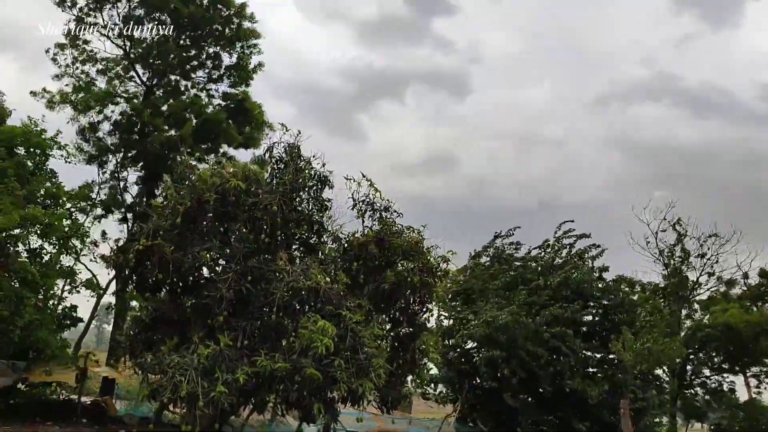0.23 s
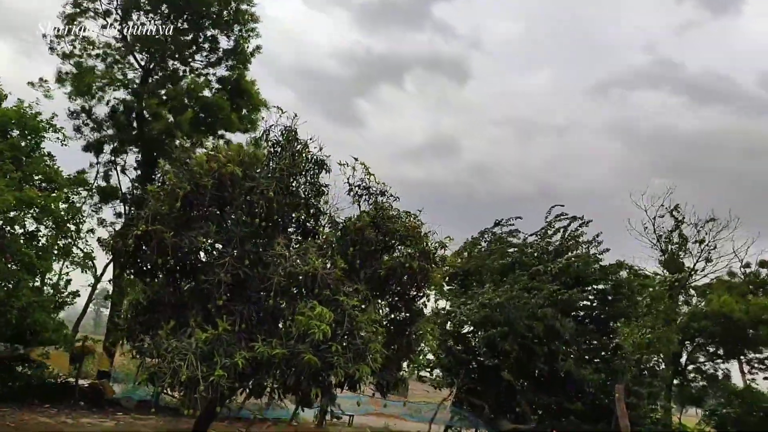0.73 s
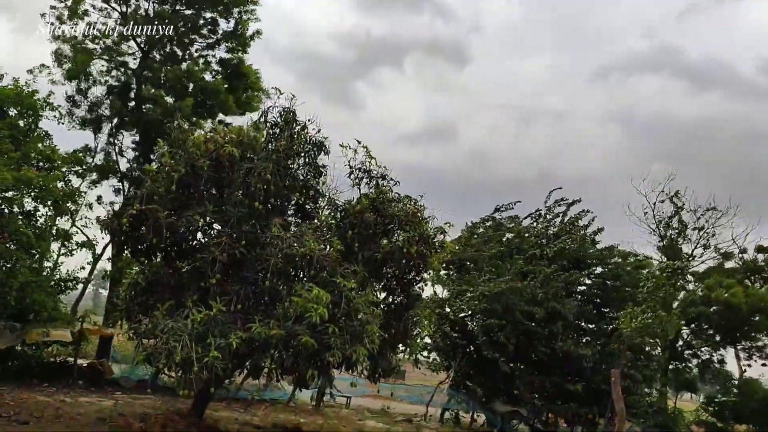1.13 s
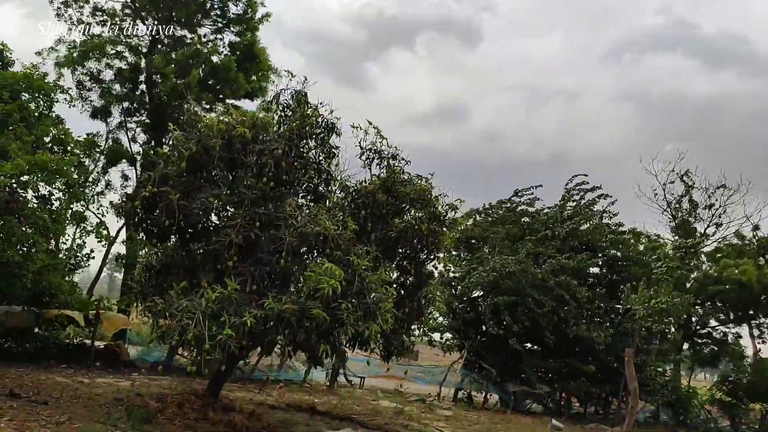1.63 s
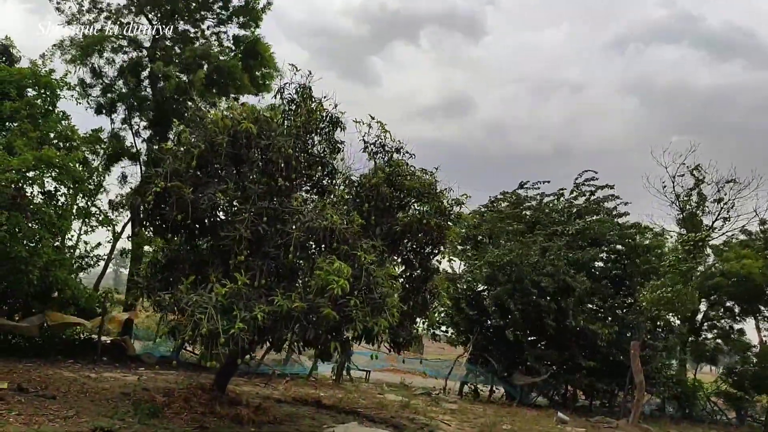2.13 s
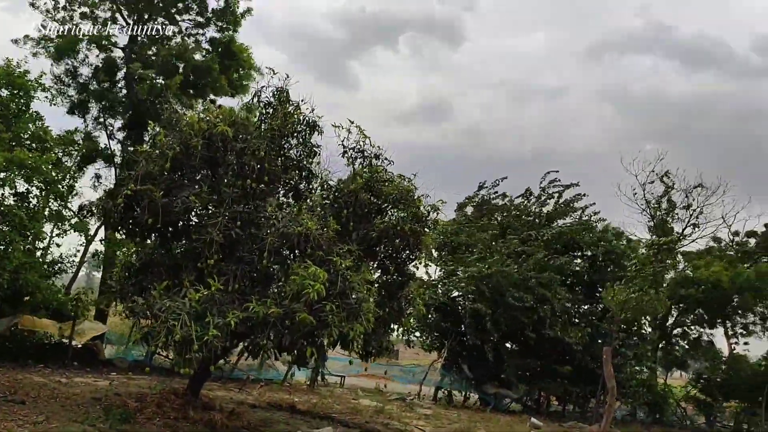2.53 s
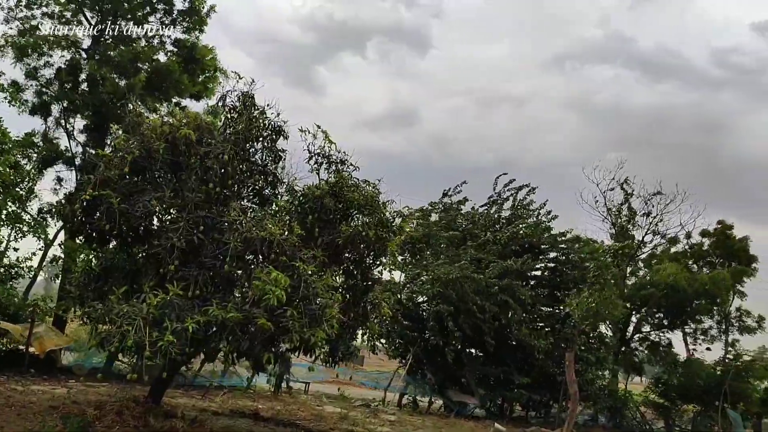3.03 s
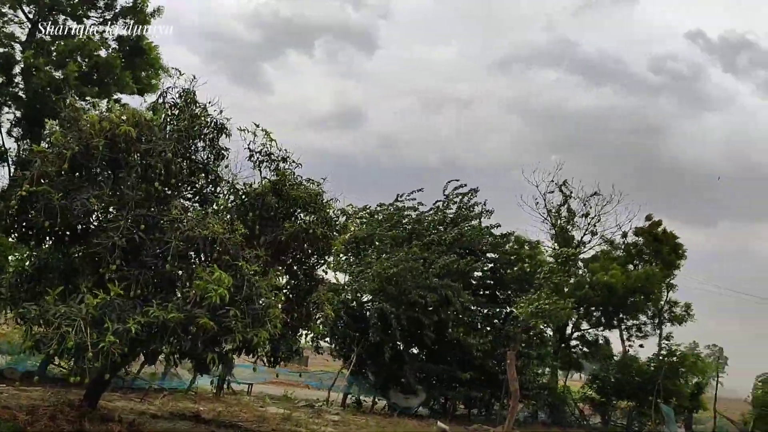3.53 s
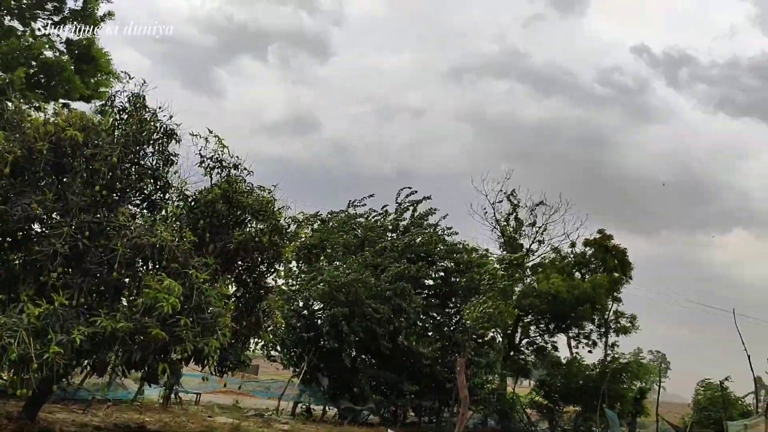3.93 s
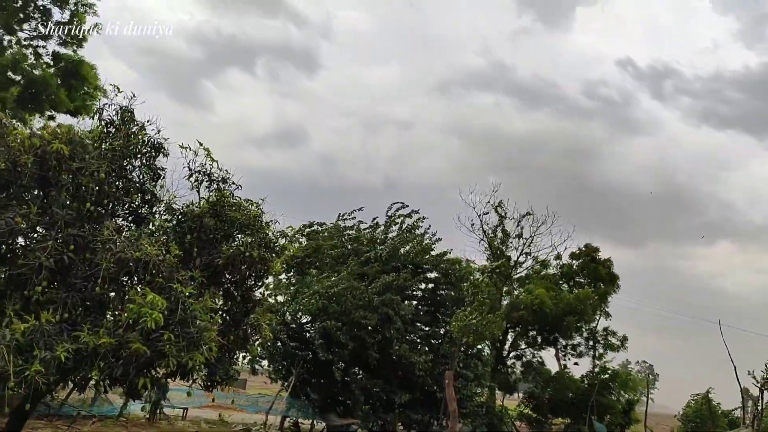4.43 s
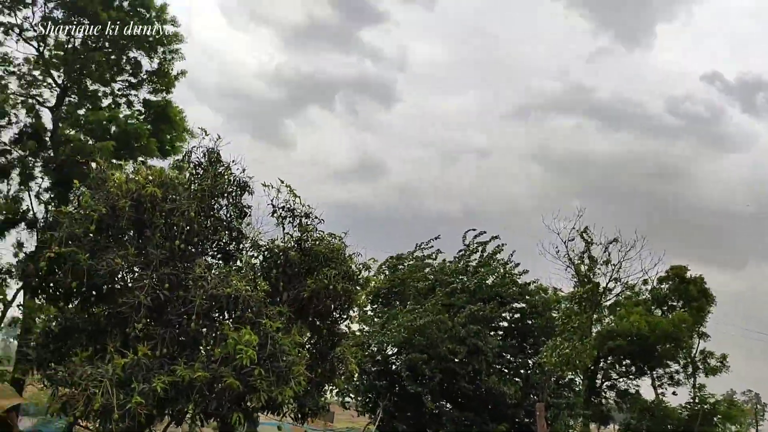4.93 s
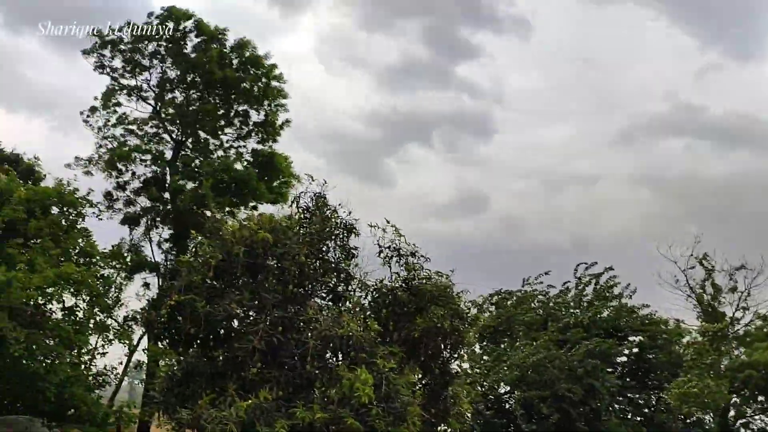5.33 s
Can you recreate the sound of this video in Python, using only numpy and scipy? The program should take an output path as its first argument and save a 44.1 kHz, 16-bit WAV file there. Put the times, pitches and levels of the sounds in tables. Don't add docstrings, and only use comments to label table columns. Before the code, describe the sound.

Strong wind buffets and pops against a microphone, eases to leafy hiss in the middle, then gusts back harder at the end.

```python
import sys
import numpy as np
from scipy import signal
from scipy.fft import rfft, irfft
from scipy.io import wavfile
from scipy.ndimage import uniform_filter1d, map_coordinates

SR = 44100
rng = np.random.default_rng(int(sys.argv[2]) if len(sys.argv) > 2 else 0)


def gain_from_db(level_db):
    decades = np.asarray(level_db, float) / 20
    return 10 ** decades


def store_wav(level_fs):
    pcm = np.round(np.clip(np.atleast_2d(level_fs), -1, 1) * 32767)
    wavfile.write(sys.argv[1], SR, pcm.T.astype(np.int16))


N = 246078

# (time [s], peak level [dB], speed jump [log ratio], fade [s])
SLAPS = [(0.029, -24, 0.18, 0.017), (0.099, -30, 0.16, 0.018), (0.145, -17, 0.25, 0.014),
         (0.185, 2, 0.16, 0.018), (0.227, -2, 0.3, 0.013), (0.251, -30, 0.18, 0.013),
         (0.308, -5, 0.21, 0.015), (0.385, -24.5, 0.21, 0.014), (0.485, -27.5, 0.19, 0.021),
         (0.498, -21, 0.18, 0.018), (0.529, -41, 0.18, 0.015), (0.562, -7.5, 0.2, 0.014),
         (0.638, -33.5, 0.24, 0.013), (1.112, -30.5, 0.15, 0.013), (3.847, -24, 0.13, 0.026),
         (3.892, -31, 0.17, 0.016), (3.983, -19, 0.21, 0.021), (4.017, -28, 0.22, 0.015),
         (4.035, -34, 0.21, 0.013), (4.076, -27, 0.17, 0.014), (4.129, -35.5, 0.24, 0.014),
         (4.153, -30.5, 0.16, 0.017), (4.181, -26, 0.2, 0.015), (4.222, -24.5, 0.22, 0.014),
         (4.289, -24, 0.18, 0.019), (4.355, -19.5, 0.17, 0.018), (4.404, -16, 0.24, 0.019),
         (4.444, -17.5, 0.19, 0.015), (4.507, -10.5, 0.2, 0.016), (4.535, -17.5, 0.19, 0.016),
         (4.624, -12.5, 0.2, 0.012), (4.742, -38, 0.21, 0.017), (4.768, -26.5, 0.2, 0.017),
         (4.822, -38, 0.17, 0.018), (4.859, -30, 0.19, 0.017), (4.94, -15, 0.22, 0.016),
         (4.968, -20, 0.2, 0.0097), (5.017, -32, 0.23, 0.014), (5.063, -18.5, 0.2, 0.013),
         (5.11, -11, 0.21, 0.016), (5.151, -14.5, 0.22, 0.016), (5.21, -24.5, 0.18, 0.019),
         (5.281, 0.5, 0.2, 0.016), (5.334, -28, 0.19, 0.015), (5.357, -28.5, 0.23, 0.01),
         (5.399, -3.5, 0.22, 0.015), (5.449, -6, 0.25, 0.018), (5.478, -17, 0.16, 0.021),
         (5.502, 4.5, 0.19, 0.016), (5.538, -11.5, 0.19, 0.013)]


def rms_one(x):
    return x / np.sqrt(np.mean(x ** 2) + 1e-20)


def smooth_twice(x, size):
    return uniform_filter1d(uniform_filter1d(x, size=size), size=size)


def in_time(rows):
    s, *columns = np.transpose(rows)
    return [np.interp(np.arange(N) / SR, s, c) for c in columns]


def at_hz(points, hz):
    point_hz, value = np.transpose(points)
    return np.interp(np.log(hz), np.log(point_hz), value)


def swells(rows):
    t = np.arange(0, N + 64, 64) / SR
    total = sum(height * np.clip(1 - abs(t - s) / swell, 0, 1) for s, height, swell in rows)
    return np.interp(np.arange(N) / SR, t, total)


def drift(rate):
    r = np.exp(-80 * np.pi * rate / SR)
    noise = rng.standard_normal(N // 40 + 2002)
    slow = signal.lfilter([1], [1, -2 * r, r * r], noise)[2000:]
    return np.interp(np.arange(N) / 40, np.arange(len(slow)), rms_one(slow))


def poles(hz, r):
    return [1, -2 * r * np.cos(2 * np.pi * hz / SR), r * r]


def filtered(x, hz, kind):
    return signal.sosfilt(signal.butter(2, hz, kind, fs=SR, output="sos"), x)


def coloured(white, spectrum, spacing):
    hz = np.fft.rfftfreq(white.shape[-1], spacing) + 1e-6
    return irfft(rfft(white) * gain_from_db(at_hz(spectrum, hz)), white.shape[-1])


def stereo_bands(source, patchy_db):
    # (frequency [Hz], correlation [-1..1])
    likeness = [(130, 1), (290, 1), (640, 0.42), (1400, -0.17), (6800, 0.071), (9500, 0.98), (15000, 0.52)]
    hz = np.fft.rfftfreq(N, 1 / SR) + 1e-6
    alike = np.clip(at_hz(likeness, hz), -1, 1)
    mid, side = rfft(source)
    pair = np.sqrt(1 + alike) * mid + np.sqrt(1 - alike) * side * [[1], [-1]]
    out, together = 0, drift(12.0)
    for octave in np.arange(4, 15):
        share = np.clip(1 - abs(np.log2(hz) - octave), 0, 1)
        flicker_db = patchy_db * (0.3 * together + drift(13.0))
        out = out + gain_from_db(flicker_db) * irfft(pair * share, N)
    return rms_one(out)


def leaves():
    # (time [s], level [dB])
    crowns = [
        (0, -34.5),
        (.34, -35),
        (1.09, -35),
        (1.41, -37),
        (2.72, -39),
        (3.29, -40.5),
        (4.56, -40.5),
        (5.13, -41),
        (5.26, -38.5),
        (5.58, -38.5),
    ]
    # (frequency [Hz], level [dB per Hz])
    leaf = [(350, -24.5), (700, 2), (1300, 0), (2300, -1), (5000, 3.5), (7600, 1), (8400, -3.5),
            (9200, -7.5), (12000, -7.5), (15500, -23.5)]
    t = np.arange(N) / SR
    clicks = gain_from_db(0.76 * rng.exponential(1, (2, N))) * rng.standard_normal((2, N))
    hiss = stereo_bands(coloured(clicks, leaf, 1 / SR), patchy_db=0.5)
    sheen_db = 3 - 1.58 * t
    top = signal.sosfiltfilt(signal.butter(2, 8800, "high", fs=SR, output="sos"), hiss)
    hiss = hiss + top * (gain_from_db(sheen_db) - 1)
    left_lead_db = -0.6 + 0.4847 * t
    return gain_from_db(in_time(crowns) + left_lead_db * [[1], [0]]) * hiss


def roar():
    # (frequency [Hz], level [dB per Hz])
    far_wind = [(20, 1.5), (60, 2), (120, 1), (300, -4.5), (600, -9), (1200, -22.5)]
    noise = coloured(rng.standard_normal((2, N)), far_wind, 1 / SR)
    return gain_from_db(-41.5) * stereo_bands(noise, patchy_db=1.5)


def left_cavity(x):
    # (frequency [Hz], width [Hz], level [dB])
    cavity = [
        (2280, 950, 1.5),
        (7520, 900, 5.5),
    ]
    out = x.copy()
    for hz, width_hz, db in cavity:
        r = np.exp(-np.pi * width_hz / SR)
        out += gain_from_db(db) * signal.lfilter([(1 - r * r) / 2, 0, (r * r - 1) / 2], poles(hz, r), x)
    return out


def air(stream, puffs):
    level_db, eddy_hz = in_time(stream)
    extra_db = swells(puffs)
    quicker_per_db = 0.0085
    return level_db + extra_db, eddy_hz * np.exp(quicker_per_db * extra_db)


def windward_air():
    # (time [s], pressure [dB], eddy rate [Hz])
    stream = [(0, -5.5, 470), (.26, -14, 380.2), (.44, -22, 130.9), (.72, -25.5, 99.74), (.82, -41, 98.9),
              (1.3, -35, 94.67), (1.68, -45, 59.73), (3.44, -89.5, 55.76), (3.5, -33, 49.55),
              (3.79, -35, 69.07), (4.07, -23.5, 140.3), (4.33, -24, 178.4), (4.56, -15, 250.4),
              (4.6, -25.5, 140.5), (5.0, -17.5, 200.5), (5.07, -13.5, 327.8), (5.29, -11, 438.3),
              (5.58, -7.5, 580.3)]
    # (time of the crest [s], extra level [dB], time to swell and to fade [s])
    puffs = [(0.16, 4, 0.073), (.295, -5, 0.029), (0.368, 3.5, 0.031), (0.511, 9, 0.035), (0.551, 7, 0.036),
             (0.65, 8, 0.092), (0.782, 9, 0.051), (0.881, 14, 0.054), (.95, 19, 0.037), (1.109, 22, 0.1),
             (1.259, 10, 0.047), (1.421, 15, 0.16), (1.912, 25.5, 0.098), (3.84, 9.5, 0.063),
             (3.99, 6.5, 0.065), (4.17, 6.5, 0.062), (4.289, 6, 0.057), (4.429, 4, 0.072), (4.7, -6, 0.06),
             (4.77, 3, 0.04), (4.909, 6.5, 0.086), (5.074, 4.5, 0.03), (5.115, 9.5, 0.042), (5.18, -5, .03),
             (5.223, 11, 0.07), (5.315, -3, 0.029), (5.345, 1.5, 0.028), (5.43, 3, 0.018),
             (5.475, 2.5, 0.022), (5.409, 6.5, 0.091), (5.57, 3, 0.043)]
    # (time [s], extra level [dB], time to swell and to fade [s], speed change [log ratio])
    surges = [(0.066, -3, 0.061, -0.013), (0.214, 3, 0.033, -0.13), (0.349, -2.5, 0.03, -0.12),
              (0.429, -2, 0.029, -0.27), (0.49, 0.5, 0.058, 0.059), (0.569, -7, 0.043, 0.17),
              (0.663, -6, 0.053, -0.027), (0.735, -7.5, 0.056, 0.073), (0.782, 5, 0.018, -0.17),
              (0.833, -1, 0.05, -0.11), (0.943, 1.5, 0.052, -0.028), (1.073, 0, 0.025, 0.25),
              (1.127, -2, 0.045, 0.28), (1.213, -4, 0.044, 0.13), (1.357, -9.5, 0.07, 0.26),
              (1.417, 2, 0.023, 0.16), (1.452, -11, 0.02, 0.087), (1.487, 3.5, 0.018, -0.18),
              (3.761, 4, 0.023, -0.068), (3.841, -2, 0.059, -0.14), (3.896, 4.5, 0.031, 0.28),
              (4.026, 5, 0.027, -0.09), (4.056, -4, 0.018, -0.2), (4.096, 3.0, 0.021, 0.2),
              (4.167, 0, 0.076, -0.22), (4.201, -2, 0.016, -0.15), (4.226, 8, 0.022, -0.25),
              (4.32, -5, 0.024, -0.19), (4.365, 1.5, 0.055, 0.14), (4.476, 0, 0.02, -0.23),
              (4.51, 4, 0.017, -0.03), (4.58, -3, 0.02, 0.037), (4.694, 3.5, 0.029, -0.065),
              (4.844, -0.5, 0.02, -0.21), (4.934, -2.5, 0.023, -0.1), (4.994, 6, 0.02, -0.028),
              (5.162, 5, 0.022, -0.11), (5.184, -2, 0.02, -0.11), (5.292, -1, 0.029, 0.1),
              (5.473, -3.5, 0.028, 0.04), (.155, -0.5, .06, 0.14), (.33, -1.5, 0.031, -0.16),
              (3.872, -4, .015, -.1), (3.94, -5.5, .035, -.2), (4.065, -4, 0.019, -0.16),
              (4.385, -3.5, .015, -.1), (4.48, 1, .015, -.1), (5.035, -3, 0.024, -0.21),
              (5.21, -2.5, .015, -.15), (5.24, 0.5, 0.031, 0.089)]
    level_db, eddy_hz = air(stream, puffs)
    level_db = level_db + swells([(s, db, swell) for s, db, swell, _ in surges])
    faster = swells([(s, jump, swell) for s, _, swell, jump in surges])
    return level_db, eddy_hz * np.exp(faster)


def leeward_air():
    # (time [s], pressure [dB], eddy rate [Hz])
    stream = [(0, -24, 111.6), (.08, -23, 121.3), (.41, -33, 100.5), (.71, -27.5, 110), (.77, -40, 79.9),
              (.95, -45.5, 54.35), (1.27, -43, 59.25), (1.67, -69, 58.38), (4.01, -62.5, 55.12),
              (4.41, -42, 55.2), (4.72, -43.5, 54.93), (5.08, -30.5, 100.5), (5.29, -20, 169.9),
              (5.58, -18.5, 212.4)]
    # (time of the crest [s], extra level [dB], time to swell and to fade [s])
    puffs = [(0.162, 14.2, 0.063), (0.239, 7.5, 0.04), (.35, 9.9, 0.039), (0.479, 5.47, 0.063),
             (0.641, 7.56, 0.093), (.86, 5.1, 0.078), (1.07, 14.5, 0.17), (1.46, 21, 0.22),
             (4.11, 29.5, 0.071), (4.299, 26.2, 0.098), (4.489, 15, .07), (4.609, 23, 0.068),
             (4.96, 16.6, 0.11), (5.152, 5.18, 0.064), (5.36, 4.33, 0.065)]
    return air(stream, puffs)


def buffet(level_db, eddy_hz, lumpy_db, flutter, slap_db=0, slap_speed=0):
    # (multiple of the eddy rate, level [dB per Hz])
    eddy = [(.05, -14.5), (.25, 2.5), (0.801, -3.5), (1.302, -6.5), (2.1, -16), (3.0, -20), (3.8, -30),
            (5, -42)]
    per_eddy, size = 64, 2 ** 18
    lumps = drift(27.91)
    frozen = coloured(rng.standard_normal(size), eddy, 1 / per_eddy)
    uneven = np.interp(np.arange(size), np.arange(0, size, 90), rng.standard_normal(2913))
    frozen *= gain_from_db(4.5 * uneven)
    speed = eddy_hz * np.exp(flutter * lumps + slap_speed)
    travelled = np.cumsum(speed) * per_eddy / SR
    pressure = rms_one(map_coordinates(frozen, [travelled], order=1, mode="wrap"))
    pressure = pressure - 0.042 * pressure ** 2
    pressure = filtered(pressure, [24, 3500], "band")
    pressure = pressure * gain_from_db(lumpy_db * lumps)
    strength = smooth_twice(pressure ** 2, 1300)
    return gain_from_db(level_db + slap_db) * pressure / np.sqrt(strength + 1e-12)


def rasp(level_db, eddy_hz):
    tear = rms_one(filtered(rng.standard_normal(N), (1260, 2990), "band"))
    faster_db = 38.5 * np.log2(eddy_hz / 500)
    return gain_from_db(level_db - 33.5 + faster_db + 3.6 * drift(21)) * tear


def flicks():
    # (time [s], peak level [dB], pitch [Hz])
    lone = [(0.181, -11, 335), (0.225, -14, 335), (0.308, -19, 330), (0.385, -36, 322), (0.483, -28, 326.2),
            (0.498, -8.5, 348), (0.527, -19.5, 330.8), (0.563, -22, 332.6), (1.11, -26, 326),
            (1.128, -30, 330), (3.891, -24, 331.5), (3.983, -28.5, 331.4), (4.014, -24.5, 328.8),
            (4.033, -25.5, 320), (4.129, -28.5, 329), (4.288, -26.5, 329.6), (4.355, -18, 330.4),
            (4.405, -5.5, 329.8), (4.443, -15.5, 331), (4.535, -12, 334), (4.621, -20.5, 331.2),
            (4.769, -20.5, 331.6), (4.939, -12, 326.7), (5.151, -21, 337.1), (5.356, -11.5, 328),
            (5.398, -7, 330.9), (5.447, -10, 328.6)]
    # (time [s], peak level [dB], pitch [Hz])
    snaps = [(0.025, -11, 406), (0.034, -13.5, 674), (0.085, -15, 528), (0.097, -23, 439),
             (0.109, -9.5, 401), (0.147, -4, 426), (0.185, -16, 480), (0.193, -11.5, 510),
             (0.213, -21, 633), (0.23, -18, 436), (0.254, -28, 606), (0.308, -25, 431), (5.06, -10.5, 441),
             (5.11, -9.5, 625.3), (5.151, -22, 423.4), (5.196, -25, 462), (5.211, -15.5, 401.3),
             (5.222, -9, 564), (5.276, -8, 519.2), (5.316, -21.5, 525.2), (5.358, -23, 430.4),
             (5.377, -13, 401), (5.401, -2.5, 546.2), (5.449, -8, 1005), (5.482, -20.5, 401),
             (5.495, -9, 407.1), (5.538, -22, 686.6)]
    life = 0.38
    out, t = np.zeros(N + 4000), np.arange(4000) / SR
    for s, db, hz in lone + snaps:
        at, turns = round(s * SR), hz * t
        swing = np.sin(2 * np.pi * turns) * turns / life * np.exp(1 - turns / life)
        out[at:at + len(t)] -= gain_from_db(db + 3) * swing
    return out[:N]


def slaps():
    kicks, t = np.zeros((2, N + 8000)), np.arange(8000) / SR
    for s, db, jump, fade in SLAPS:
        at = round(s * SR)
        extra_db = np.clip(0.43 * (db + 26), 0, 12)
        kicks[:, at:at + len(t)] += np.exp(-t / max(fade, .004)) * [[extra_db], [jump]]
    return uniform_filter1d(kicks[:, :N], size=160)


def pops(eddy_hz):
    pop_db, pop_eddies, pop_cycles = -10, 1.41, 1.2
    out, t = np.zeros(N + 4000), np.arange(4000) / SR
    for s, db, jump, _ in SLAPS:
        at = round(s * SR)
        turns = pop_eddies * eddy_hz[at] * np.exp(jump) * t
        swing = np.sin(2 * np.pi * turns) * turns * np.exp(1 - turns / pop_cycles * 2.3) * 2
        out[at:at + len(t)] -= gain_from_db(db + pop_db) * swing
    return filtered(out[:N], 530, "low")


def windward_wind():
    (level_db, eddy_hz), (slap_db, slap_speed) = windward_air(), slaps()
    wind = buffet(level_db, eddy_hz, 1.94, .07, slap_db, slap_speed)
    return wind + pops(eddy_hz) + flicks() + rasp(level_db + slap_db, eddy_hz)


def grit():
    # (time [s], left level [dB], right level [dB], ring [Hz], length [s])
    scraps = [(2.88, -15.5, -38, 7700, 0.0024), (5.054, -14, -39, 7800, 0.003),
              (5.055, -41, -35, 13730, 0.013), (5.053, -38, -37, 14000, 0.0046),
              (5.055, -24, -32, 4800, .006), (5.07, -42, -45, 13800, 0.011),
              (5.063, -39, -43, 16000, 0.0077), (5.252, -33.5, -26.5, 7100, 0.048),
              (5.283, -44, -32, 8000, .03), (5.225, -45.5, -38, 7700, .03), (5.258, -44, -44, 16000, 0.037)]
    out, scratches = np.zeros((2, N)), rng.standard_normal((len(scraps), 4000))
    for (s, left_db, right_db, hz, length), scratch in zip(scraps, scratches):
        width_hz = min(270000 * length, 6950)
        r = np.exp(-np.pi * width_hz / SR)
        ringing = scratch * np.exp(-8 * ((np.arange(4000) - 2000) / (length * SR)) ** 2)
        for _ in range(2):
            ringing = signal.lfilter([1, 0, -1], poles(hz, r), ringing)
        at = round(s * SR) - 2000
        out[:, at:at + len(ringing)] += gain_from_db([[left_db], [right_db]]) * ringing / abs(ringing).max()
    return out


def scene():
    left, right = leaves() + roar()
    left = left_cavity(left) + windward_wind()
    right = right + buffet(*leeward_air(), lumpy_db=5.5, flutter=.14)
    return np.array([left, right]) + grit()


def turn_down(x):
    ceiling_db, squeeze, recover_db_per_s = -14.5, 0.86, 41.5
    react = round(0.097 * SR)
    ramp = recover_db_per_s * np.arange(N) / SR
    level_db = 10 * np.log10(uniform_filter1d(x ** 2, react) + 1e-12)
    over_db = np.clip(level_db - ceiling_db, 0, None)
    held_db = np.maximum.accumulate(over_db + ramp) - ramp
    return x * gain_from_db(-squeeze * uniform_filter1d(held_db, react))


def noise_gate(x):
    # (frequency [Hz], level [dB])
    gate = [(600, -15), (1200, -1.5), (2500, -2), (5000, 1.2), (7500, -.5), (8800, 1.0), (15000, 1.2)]
    steepness = 8
    frame = dict(fs=SR, window="cosine", nperseg=2048, noverlap=1024)
    hz, _, cells = signal.stft(x, **frame)
    power = np.sum(abs(cells) ** 2, axis=0)
    power = uniform_filter1d(uniform_filter1d(power, size=3, axis=0), size=2, axis=1)
    around = uniform_filter1d(np.log(power + 1e-20), size=31, axis=0)
    around = np.exp(uniform_filter1d(around, size=3, axis=1))
    over = power / (around * gain_from_db(2 * at_hz(gate, hz + 1))[:, None] + 1e-20)
    return signal.istft(cells / (1 + (over + 1e-6) ** -steepness), **frame)[1][:, :N]


def kept(shape):
    # (frequency [Hz], rarity for the sum [spreads], rarity for the difference [spreads])
    dropped = [(600, 4, 4), (1200, 1.5, 1.6), (2200, 2.4, 2.4), (5000, 1.6, 1.5), (7500, 2.4, 2),
               (8900, 1, .6), (11500, 1, 0), (15500, .6, -.3)]
    patches = uniform_filter1d(rng.standard_normal(shape), size=2, axis=0)
    patches = rms_one(uniform_filter1d(patches, size=18, axis=1))
    hz = (np.arange(shape[1]) + .5) * SR / 2048
    centres, *rarities = np.transpose(dropped)
    limits = [np.interp(np.log(hz), np.log(centres), rarity) for rarity in rarities]
    return patches < np.array(limits)[:, None]


def coarse_memory(x):
    # (frequency [Hz], level [dB])
    sum_steps = [(200, 25.5), (800, 15.5), (1200, 12.5), (2000, 14), (3000, 10.5), (5000, 9.5),
                 (7500, 15.5), (9000, 4), (11500, 2.5), (14500, -1)]
    # (frequency [Hz], level [dB])
    coarser = [(300, 4), (1500, -1), (7500, 1), (9000, 5), (14500, 4)]
    half, start, top_cell = 1024, 1024 - 736, 732
    rise = np.cumsum(np.kaiser(half + 1, 4 * np.pi))
    window = np.sqrt(np.r_[rise[:half], rise[half - 1::-1]] / rise[-1])
    turns = np.outer(np.arange(half) + .5, np.arange(2 * half) + .5 + half / 2)
    basis = window * np.cos(np.pi / half * turns)
    padding = ((0, 0), (start + half, 3 * half - (N + start) % half))
    blocks = np.pad([x[0] + x[1], x[0] - x[1]], padding).reshape(2, -1, half)
    cells = np.concatenate([blocks[:, :-1], blocks[:, 1:]], axis=2) @ basis.T
    edges = np.r_[0:40:4, 40:96:8, 96:144:12, 144:176:16, 176:216:20, 216:264:24, 264:320:28, 320:1025:32]
    width = np.diff(edges)
    power = np.add.reduceat(np.mean(cells ** 2, axis=0), edges[:-1], axis=1) / width
    hz = (edges[1:] + edges[:-1]) * SR / 4096
    fine_db = at_hz(sum_steps, hz) - at_hz(coarser, hz) * [[[0]], [[1]]]
    fine_db = fine_db + 3.5 * rng.standard_normal((2, *power.shape))
    usual = np.sqrt(uniform_filter1d(power, size=3, axis=0) + 1e-20)
    step = np.repeat(usual * gain_from_db(-fine_db), width, axis=2)
    rounded = np.floor((abs(cells) / step) ** .75 + .4054) ** (4 / 3) * (np.arange(half) < top_cell)
    rounded = np.sign(cells) * rounded * kept(rounded.shape[1:]) * step
    frames = rounded @ basis / half
    joined = frames[:, 1:, :half] + frames[:, :-1, half:]
    mid, side = joined.reshape(2, -1)[:, start:start + N]
    return np.array([mid + side, mid - side])


def low_pass(x):
    return signal.sosfilt(signal.butter(12, 15680, fs=SR, output="sos"), x)


def record(dry):
    held = np.array([turn_down(dry[0]), dry[1]])
    rounded = 1.07 * np.tanh(held / 0.91)
    mix = coarse_memory(noise_gate(rounded))
    return low_pass(mix)


dry = scene()
out = record(dry)
store_wav(out)
```